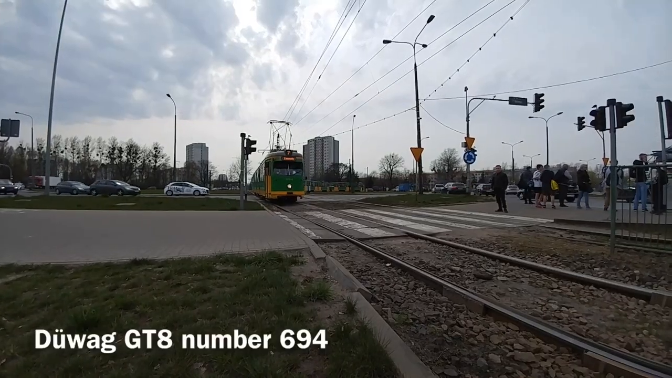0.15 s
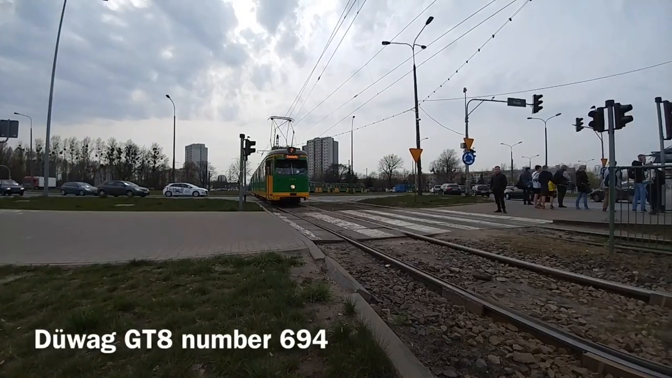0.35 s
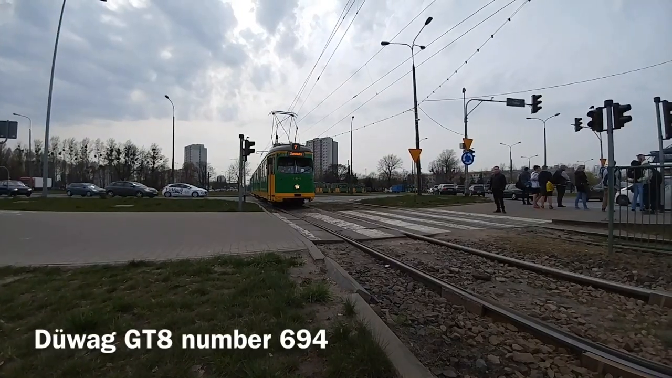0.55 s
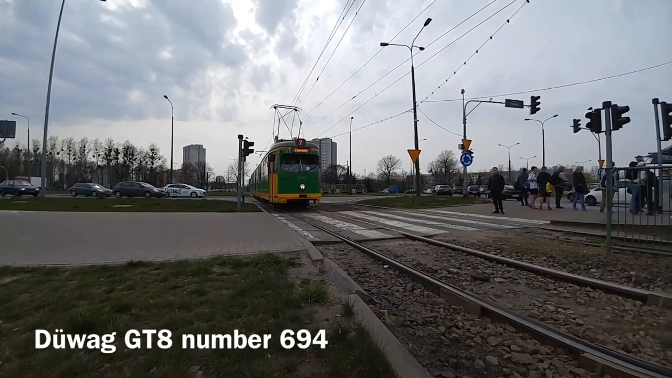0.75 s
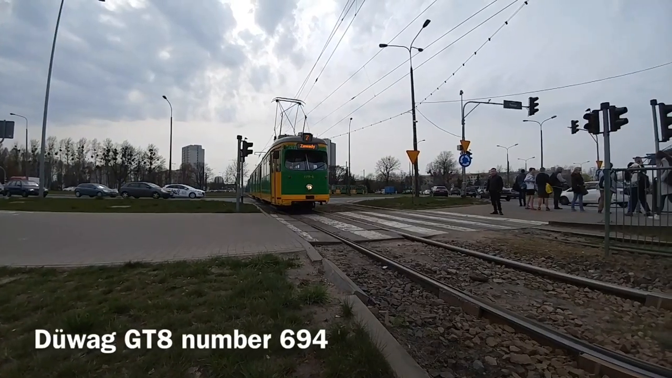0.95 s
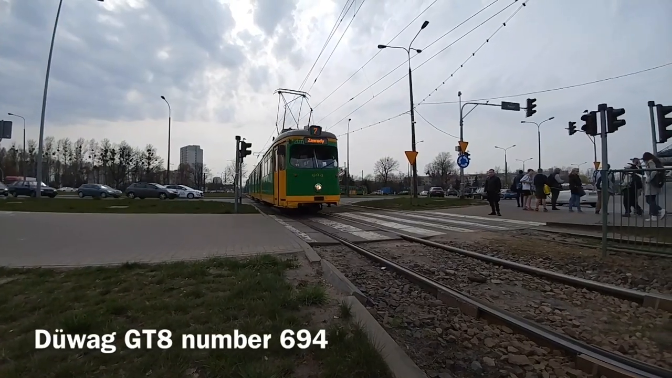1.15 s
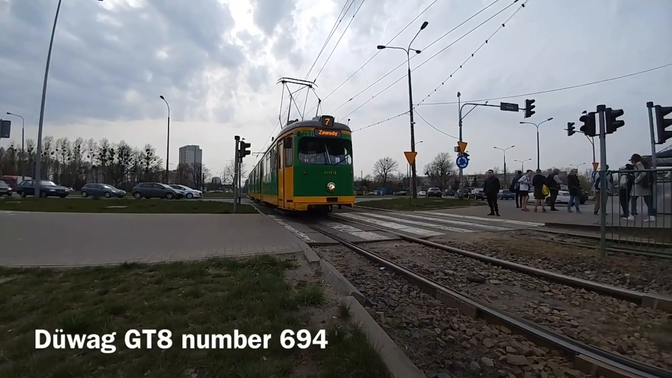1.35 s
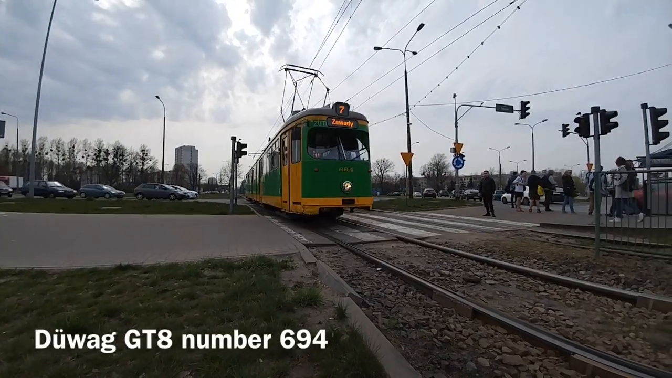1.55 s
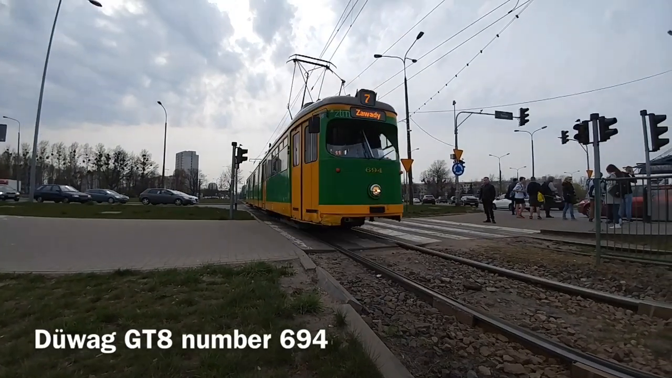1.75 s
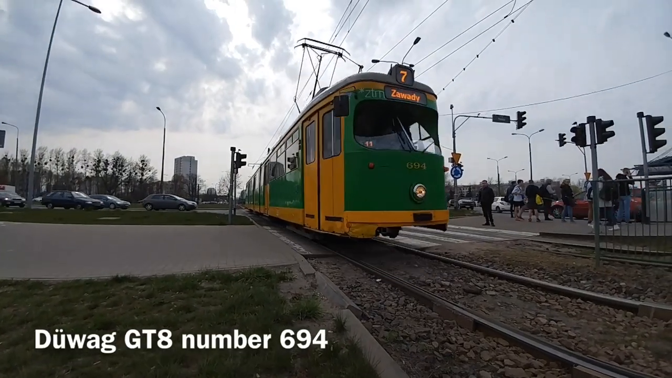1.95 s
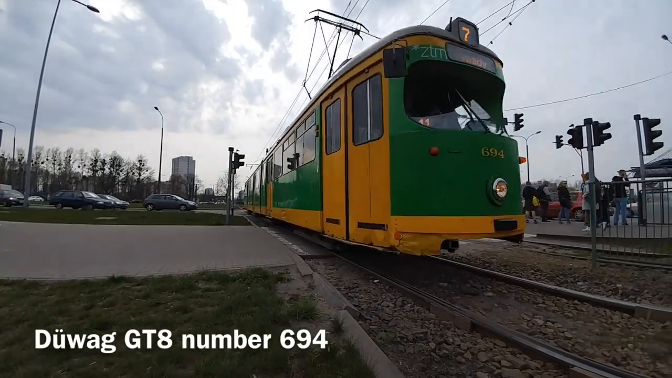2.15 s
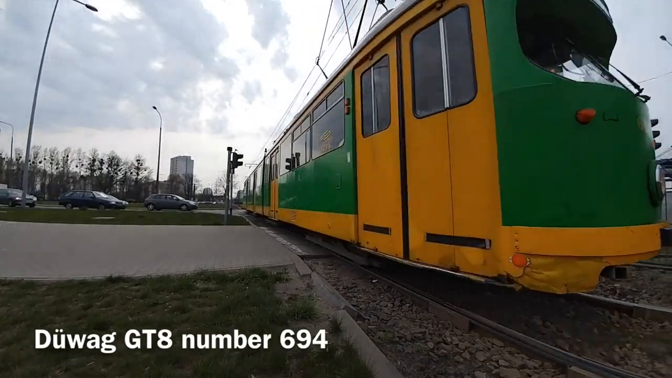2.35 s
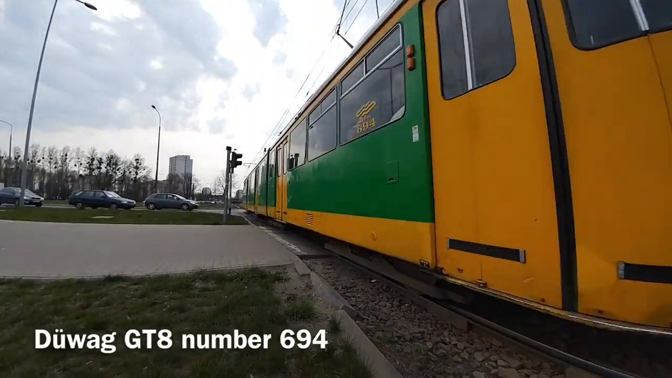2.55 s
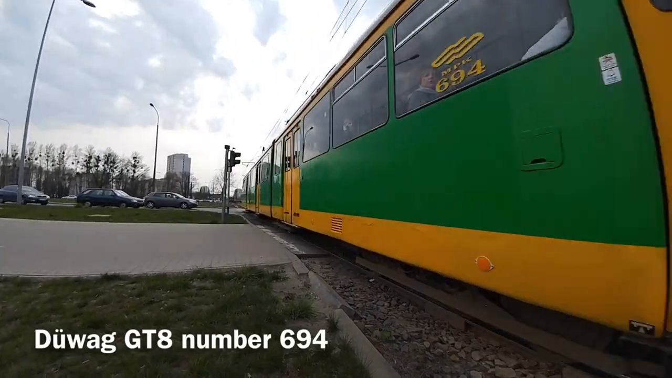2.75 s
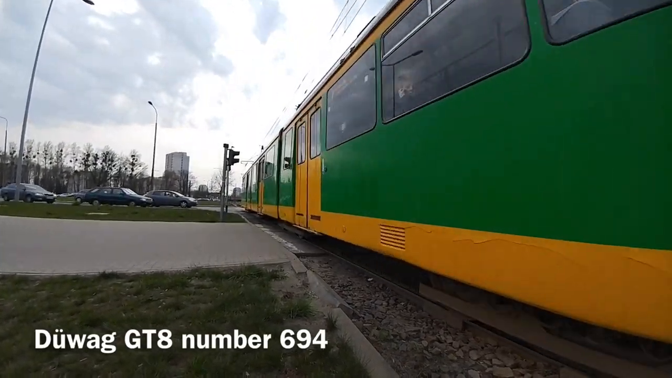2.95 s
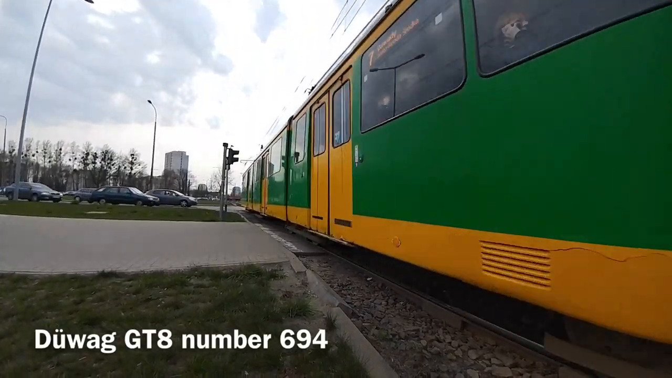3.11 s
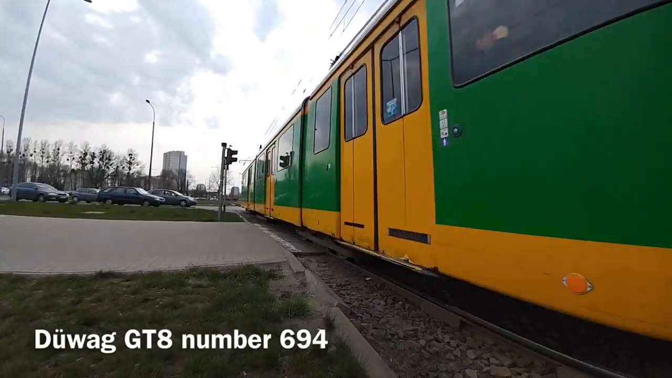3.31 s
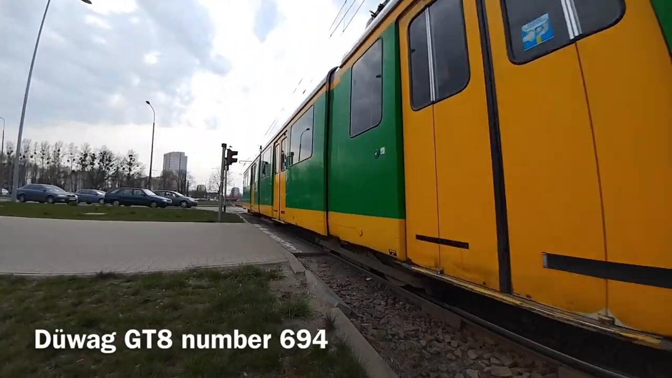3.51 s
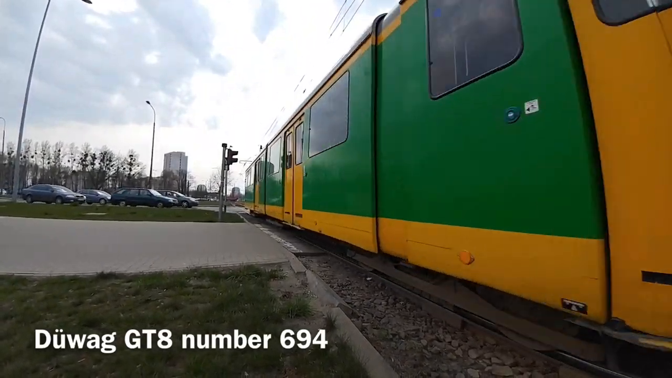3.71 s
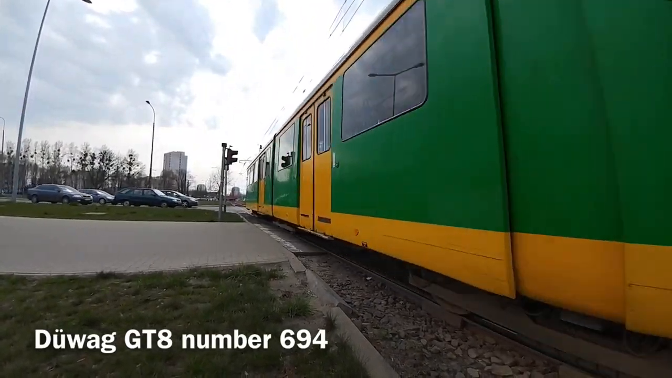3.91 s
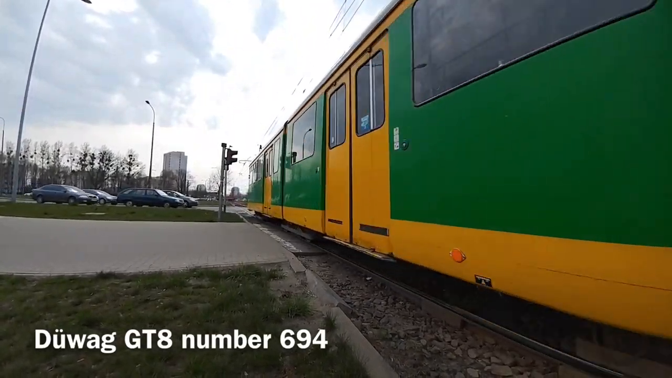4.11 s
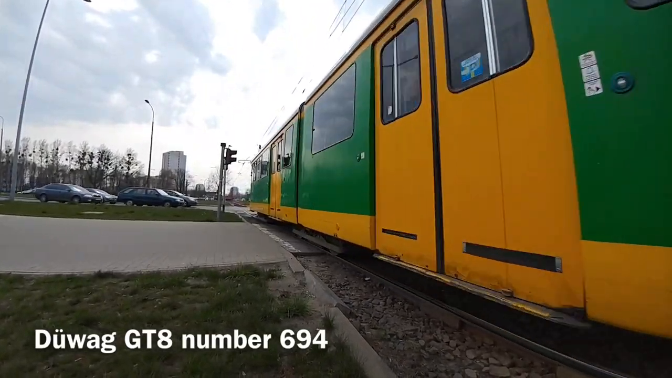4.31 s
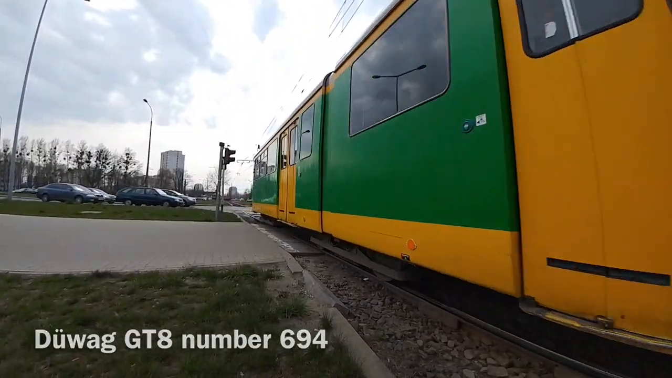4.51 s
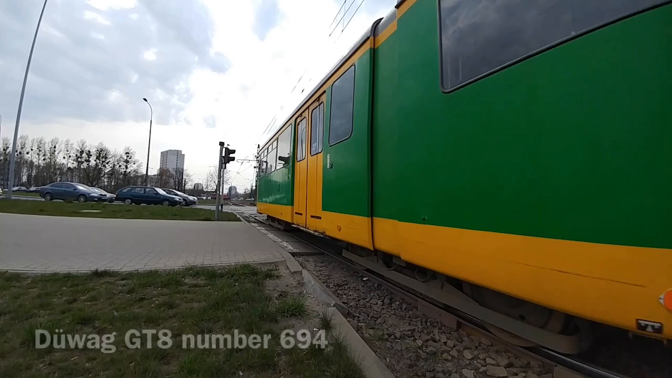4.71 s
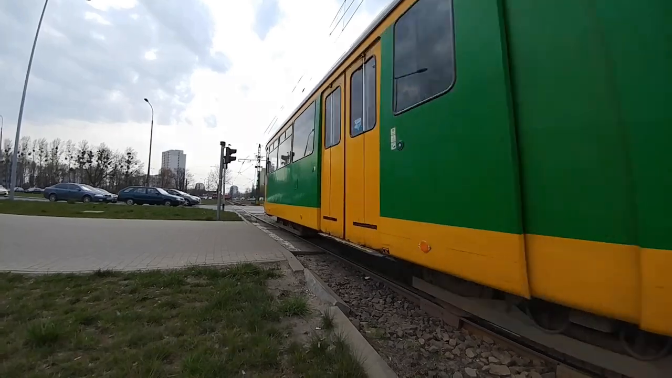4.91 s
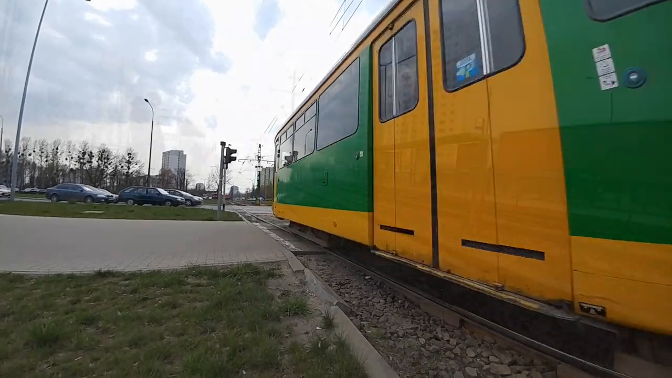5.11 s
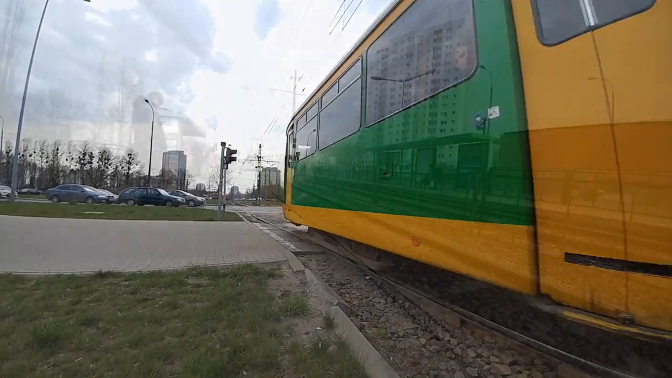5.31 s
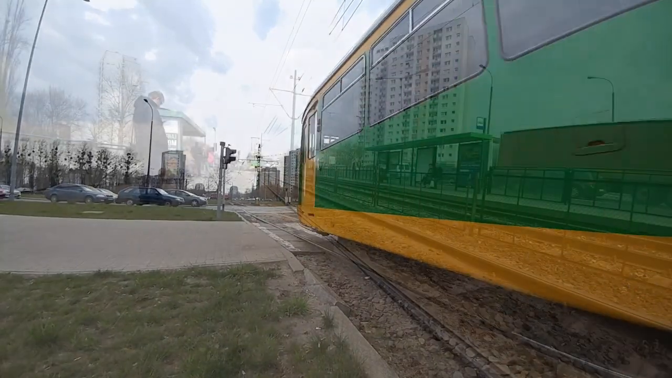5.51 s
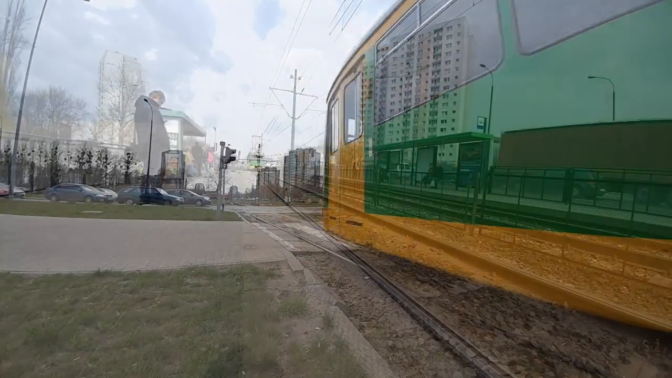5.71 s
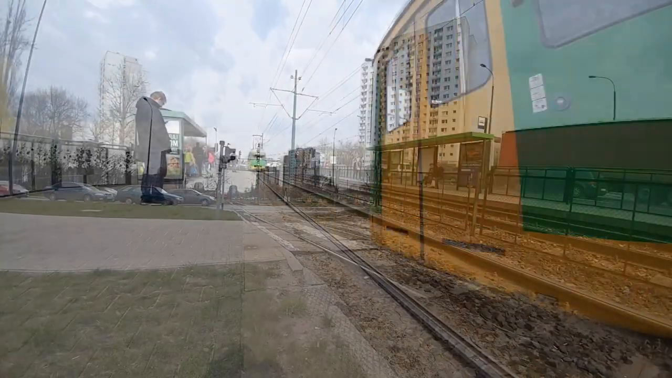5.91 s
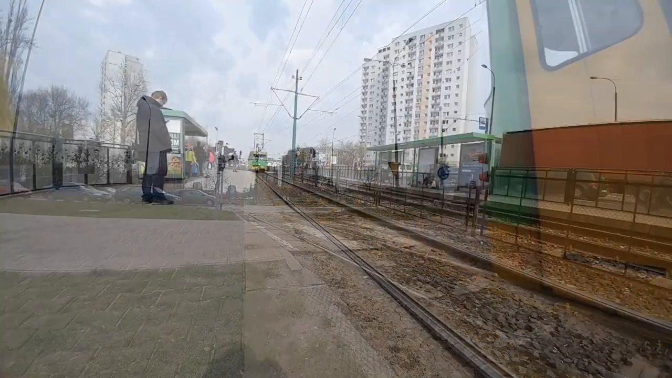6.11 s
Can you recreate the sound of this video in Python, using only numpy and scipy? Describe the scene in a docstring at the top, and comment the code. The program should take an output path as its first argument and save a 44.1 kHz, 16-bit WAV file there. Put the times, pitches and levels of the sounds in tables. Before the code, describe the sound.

A tram approaches from ahead across a street crossing, its wheels clacking over joints. As its nose draws level, the sound brightens sharply and widens: gritty rolling roar, heavy thumps, loose steel rattling in clusters. Several sets of wheels pass in turn, with brief squeaks near the end. Then the roar falls away, leaving rumble and traffic. Captured outdoors, close to the track, with dulled top treble.

```python
"""A low ground rumble and the hum of distant traffic, both coloured noise, with scuffs and knocks of steel.
An articulated tram rolls up over a street crossing and passes close to the right of a camera.
Its wheels knock (struck noise), then roar on rough rails (noise shaped by the bumps of the treads);
rails hum, body panels boom and the low rumble swells (sine modes that swell and fade).
Running gear rattles and ticks, grit crunches (bursts of coloured noise), flanges chirp (unsteady tones)."""
import sys
import numpy as np
from scipy import signal
from scipy.fft import rfft, irfft, next_fast_len
from scipy.io import wavfile
from scipy.ndimage import uniform_filter1d, minimum_filter1d, map_coordinates

SR = 44100
rng = np.random.default_rng(int(sys.argv[2]) if len(sys.argv) > 2 else 0)


def store_wav(level_fs):
    """Save 16-bit WAV to argv[1]."""
    pcm = np.round(np.clip(np.atleast_2d(level_fs), -1, 1) * 32767)
    wavfile.write(sys.argv[1], SR, pcm.T.astype(np.int16))


N = 276066

# spectrum of steel parts and grit: freq_hz, level_db
STEEL_SPECTRUM = [(500, -18), (1400, -6.5), (2400, 4.5), (3300, 0.5), (4500, 1.5), (6000, -3), (7400, -2),
                  (9000, 5.5), (16000, -3)]
# spectrum of small steel parts: freq_hz, level_db
TINKLE_SPECTRUM = [(1000, -30), (2400, -11), (3500, 1.5), (4500, 2), (6000, 2), (7400, 1), (9000, 6),
                   (16000, -4)]
# left-right likeness of sound from ahead and all around: freq_hz, correlation (-1 to 1)
ALIKE_FAR_CORR = [(40, 0.68), (100, 0.66), (200, 0.21), (600, 0.53), (1000, 0.27), (1400, -0.63),
                  (1850, 0.095), (2400, 0.59), (3200, -0.55), (4500, -0.02)]
SPEED_M_PER_S, TRACK_M = 6.36, 2.88  # steady tram speed; microphone to the wheels' path
HISS_GROWS_DB_PER_DB = 1.4  # treble gain per dB of nearness


def amp(db):
    """Decibels to gain."""
    return 10 ** (np.asarray(db) / 20)


def unit(x):
    """x at rms 1."""
    return x / np.sqrt(np.mean(x ** 2) + 1e-20)


def along(points, hz):
    """(Hz, value) points read on a log frequency axis."""
    f, v = np.transpose(points)
    return np.interp(np.log(hz + 1), np.log(f + 1), v)


def wobble(knots_per_s):
    """A smooth random curve."""
    knots = rng.standard_normal(int(N * knots_per_s / SR) + 4)
    return map_coordinates(knots, [np.arange(N) * knots_per_s / SR])


def filtered(x, response):
    """x times a response of frequency."""
    m = next_fast_len(N + 8192, True)
    spectrum = rfft(x, m) * response(np.fft.rfftfreq(m, 1 / SR))
    return irfft(spectrum, m)[..., :N]


def noise(spectrum):
    """Two unrelated coloured noises of joint rms 1."""
    return unit(filtered(rng.standard_normal((2, N)), lambda hz: amp(along(spectrum, hz))))


def steady(x, size):
    """x with its level evened out over size samples."""
    return x / np.sqrt(np.abs(uniform_filter1d(x ** 2, size=size)) + 1e-9)


def patchy(x, depth_db, size):
    """x coloured by resonances that come and go; size = their extent in (frequency bins, frames)."""
    z = signal.stft(x, nperseg=1024)[2]
    field = rng.standard_normal(z.shape[1:])
    for axis in (0, 1, 0, 1):
        field = uniform_filter1d(field, size=size[axis], axis=axis)
    coloured = signal.istft(z * amp(depth_db * unit(field)), nperseg=1024)[1]
    return unit(coloured[:, :N])


def step(s, width_s):
    """A smooth rise from 0 to 1 around time s."""
    return .5 + .5 * np.tanh((np.arange(N) / SR - s) / (2 * width_s))


def swell(s, half_s):
    """Bell-shaped envelope around time s."""
    return np.exp(-.5 * np.minimum(((np.arange(N) / SR - s) / half_s) ** 2, 50))


def bumps(rate_per_s, spread_db, t60_s):
    """Envelope of rms 1 of random contacts, each starting sharply and dying away."""
    hits = rng.random(N) < rate_per_s / SR
    power = hits * amp(spread_db * np.clip(rng.standard_normal(N), -2, 2)) ** 2
    decay = amp(-60 / (t60_s * SR)) ** 2
    return unit(np.sqrt(signal.lfilter([1], [1, -decay], power)))


def blows(rows, rise_s):
    """Summed envelope of (s, dB, t60 s) blows, each rising sharply and dying away within half a second."""
    out, t = np.zeros(N + SR), np.arange(SR // 2) / SR
    for s, db, t60_s in rows:
        out[round(s * SR):][:len(t)] += (1 - np.exp(-t / rise_s)) * amp(db - 60 * t / t60_s)
    return out[:N]


def ringing(rows, wander_rad):
    """Per (s, Hz, dB, half length s) a mode swells and fades, its phase wandering apart in two channels."""
    t, out = np.arange(N) / SR, np.zeros((2, N))
    drift = wander_rad * np.array([wobble(50), wobble(50)])
    starts = rng.uniform(0, 2 * np.pi, (len(rows), 2, 1))
    for (s, hz, db, half_s), phase in zip(rows, starts):
        on = np.abs(t - s) < 4 * half_s
        mode = np.sin(2 * np.pi * hz * t[on] + phase + drift[:, on])
        out[:, on] += amp(db) * swell(s, half_s)[on] * mode
    return out


def placed(pair, alike, lag_ms):
    """Two unrelated signals as left and right, partly alike, the left one late."""
    def mix(hz):
        turn = np.arccos(np.clip(along(alike, hz), -1, 1)) / 2
        return np.array([np.cos(turn), np.sin(turn)])

    def delay(hz):  # half the lag on each side
        return np.exp(1j * np.pi * hz * lag_ms / 1000 * np.array([[-1], [1]]))

    mid, side = filtered(pair, mix)
    return filtered(np.array([mid + side, mid - side]), delay)


def nearness_db():
    """Power from the four bogies adds up, each falling off with the square of its distance."""
    # bogies passing: abreast_s, strength_db
    bogies = [(2.68, -2), (3.64, -0.5), (4.78, 1.5), (5.4, -4)]
    t = np.arange(N) / SR
    power = sum(amp(db) ** 2 / (1 + (SPEED_M_PER_S * (t - s) / TRACK_M) ** 2) for s, db in bogies)
    return 10 * np.log10(power)


def car_nearness_db():
    """The long car body sounds from whichever part of it is nearest."""
    front_s, rear_s = 3.31, 5.2  # the droning floor is abreast between these
    t = np.arange(N) / SR
    away_m = SPEED_M_PER_S * (t - np.clip(t, front_s, rear_s))
    return -10 * np.log10(1 + (away_m / TRACK_M) ** 2)


def beside_share():
    """Share of the sound from beside the microphone (0-1); it rises as the nose draws level."""
    return step(2.15, width_s=.14)


def lulls_db():
    """Depth of the brief dips of the treble."""
    # treble dips: middle_s, half_length_s, depth_db
    lulls = [(.51, .04, 6), (1.43, 0.077, 23), (2.254, 0.0083, 13), (2.59, 0.012, 3.5), (2.788, 0.015, 2),
             (3.091, .018, 4.5), (3.28, 0.13, 1), (3.377, 0.0059, 4), (4.321, 0.0075, 3), (4.433, 0.015, 5),
             (4.626, 0.0046, 7), (5.3, 0.026, 0.5), (6.09, 0.029, 1.5)]
    return sum(db * swell(s, half_s) for s, half_s, db in lulls)


def street():
    """Distant road traffic: coloured noise from all around, its level wavering slightly."""
    # traffic spectrum: freq_hz, level_db
    street_spectrum = [(60, -9), (200, 8), (500, 16), (1000, 6), (2000, -5), (3200, -55), (6000, -60),
                       (8000, -31), (9100, -6), (10500, -8.5), (15500, -6)]
    level_db = -32.5 + 0.15 * wobble(6.0)
    return amp(level_db) * placed(noise(street_spectrum), ALIKE_FAR_CORR, lag_ms=0)


def flanges():
    """A flange sticks and slips on the rail head: one wheel mode sings briefly, clear or hoarse."""
    # chirps: middle_s, pitch_hz, level_db, half_length_s, octave_db (re fundamental),
    # hoarseness (0-1), pitch_fall (share)
    chirps = [(1.618, 5270, -46, .02, -40, 0.9, .005), (1.738, 5760, -46, .018, -40, .9, 0.01),
              (4.762, 2000, -24, .055, -27, 0.4, 0.0019), (4.835, 2033, -15, .014, -21, 0.25, -.002),
              (4.972, 2970, -30, .02, -2, 0.23, .002), (5.002, 2894, -16.5, 0.012, -1.5, 0.3, 0.0078),
              (5.267, 2980, -22.5, .016, -26, 0.3, 0.023), (5.345, 3360, -26, .009, -20, 0.3, 0.0036),
              (5.481, 1896, -28, 0.028, -25, 0.28, 0.012), (5.671, 5360, -23.5, .007, -42, 0.4, 0),
              (5.964, 5970, -26, 0.0061, -39, .9, 0)]
    waver_share, waver_hoarse_share = 0.0038, 0.032  # pitch unsteadiness: of all, added by hoarseness
    t, out = np.arange(N) / SR, np.zeros((2, N))
    waver = wobble(700)
    rasp = np.array([wobble(380) + 1j * wobble(380) for _ in range(2)])
    for s, hz, db, half_s, octave_db, hoarse, fall in chirps:
        on = np.abs(t - s) < 5 * half_s
        hoarse = np.clip(hoarse, 0, 1)
        bend = 1 - fall * np.tanh((t[on] - s) / half_s)
        pitch_hz = hz * bend * (1 + (waver_share + waver_hoarse_share * hoarse) * waver[on])
        turn = np.exp(2j * np.pi * np.cumsum(pitch_hz) / SR)
        grip = np.sqrt(1 - hoarse) + np.sqrt(hoarse / 2) * rasp[:, on]
        tone = np.real(grip * (turn + amp(octave_db) * turn ** 2))
        out[:, on] += amp(db) * swell(s, half_s)[on] * tone
    return out


def ticks():
    """Single hard contacts of steel: one crisp crack each."""
    # ticks of steel on steel: start_s, level_db
    tick_rows = [(2.505, -12.5), (2.837, -11), (2.872, -7), (3.213, -16), (3.364, -15), (3.392, -16),
                 (3.632, -14), (3.836, -14), (4.124, -15), (4.156, -13), (4.329, -12), (4.358, -9),
                 (4.603, -16), (4.637, -18), (4.648, -15), (5.103, -9), (5.114, -7), (5.425, -21),
                 (5.673, -20)]
    cracks = blows([(s, db, .016) for s, db in tick_rows], rise_s=.0004)
    return cracks * patchy(noise(TINKLE_SPECTRUM), depth_db=3, size=(8, 4))


def rattles():
    """Steel parts clash and scuff in short clusters of contacts: small ones tinkle, heavy ones clank."""
    # loudest clashes of loose running gear: start_s, tinkle_db, clank_db, t60_s
    clashes = [(1.096, -31.5, -47, 0.22), (1.23, -38, -40, 0.14), (1.29, -38, -40, 0.15),
               (2.191, -21.5, -21.5, 0.13), (2.285, -25.5, -22.5, 0.11), (2.341, -24, -20.5, 0.089),
               (2.395, -27, -22, 0.21), (2.427, -21, -18, .07), (2.504, -16, -21, 0.08),
               (2.536, -21, -24, 0.091), (2.632, -24, -20.5, 0.13), (2.692, -41, -17, 0.068),
               (2.724, -22, -14.5, 0.094), (2.761, -32, -17, 0.059), (2.834, -16, -22, 0.23),
               (3.133, -21.5, -18, 0.079), (3.193, -22, -12.5, 0.042), (3.39, -16.5, -14, 0.094),
               (3.413, -22, -20.5, 0.19), (3.436, -32, -19, 0.08), (3.517, -23, -17.5, 0.14),
               (3.553, -20, -27, 0.056), (3.575, -32, -29, 0.024), (3.633, -18, -14, 0.1),
               (3.658, -19, -19, 0.039), (3.724, -20, -31, 0.06), (3.805, -17, -24, 0.067),
               (3.831, -13, -15, 0.18), (3.869, -20, -29, 0.15), (4.024, -25, -22, .07),
               (4.09, -18, -16, 0.059), (4.121, -16.5, -23, 0.14), (4.152, -16, -17, 0.045),
               (4.181, -18.5, -22, 0.11), (4.209, -26, -23, 0.2), (4.355, -14, -15, 0.1),
               (4.485, -23, -30, 0.036), (4.522, -35, -24, 0.065), (4.594, -23, -18, 0.093),
               (4.637, -15, -18.5, 0.13), (4.665, -16, -22, 0.055), (4.823, -12.5, -21, 0.14),
               (4.847, -20, -23, 0.15), (4.892, -22, -18, 0.091), (5.152, -18, -28, 0.13),
               (5.202, -18, -15, 0.082), (5.328, -26.5, -22, 0.75), (5.423, -25, -25, 0.035),
               (5.549, -29, -17, 0.064), (5.589, -19.5, -22.5, 0.18), (5.615, -40, -23.5, 0.26),
               (5.717, -36, -23, 0.049), (5.99, -26.5, -23, 0.089), (6.149, -21.5, -21, 0.086)]
    # steel scuffing on steel: middle_s, hiss_db, half_length_s, groan_db
    scuff_rows = [(0.128, -33.5, 0.034, -22.5), (0.225, -41, 0.13, -29), (1.178, -41.5, 0.14, -35),
                  (1.953, -58, 0.087, -29), (2.193, -32.5, 0.033, -22), (2.703, -49, 0.032, -17.5),
                  (2.835, -25.5, 0.029, -15.5), (2.93, -28, 0.032, -18), (3.444, -26, 0.03, -18.5),
                  (4.007, -29.5, 0.061, -21), (4.32, -40, 0.026, -20.5), (4.61, -22, .053, -23),
                  (4.943, -22.5, 0.031, -34), (5.696, -27, 0.014, -18), (5.864, -33, 0.047, -25.5),
                  (5.965, -28.5, 0.025, -37), (6.05, -31, 0.013, -52), (6.17, -29, 0.019, -57)]
    # spectrum of heavy parts: freq_hz, level_db
    clank_spectrum = [(500, -9), (1000, 1.5), (1500, 0), (2300, -2.5), (3000, -9.5), (4500, -10),
                      (9000, -33)]
    # spectrum of groaning scuffs: freq_hz, level_db
    groan_spectrum = [(300, -5.5), (600, 1.5), (850, -2.5), (1130, -4), (1400, -8.5), (1800, -15.5),
                      (4000, -37)]
    clatter_db = -33.5  # lesser clashes at random, heard close by

    tinkles = blows([(s, db, t60_s) for s, db, _, t60_s in clashes], rise_s=.0018)
    clanks = blows([(s, db, t60_s) for s, _, db, t60_s in clashes], rise_s=.0018)
    jolts = bumps(rate_per_s=41, spread_db=3, t60_s=.16)
    jolt_db = clatter_db + HISS_GROWS_DB_PER_DB * nearness_db() - lulls_db()
    clatter = amp(jolt_db) * beside_share() * jolts
    scuffs = sum(amp(db) * swell(s, half_s) for s, db, half_s, _ in scuff_rows)
    groans = sum(amp(db) * swell(s, half_s) for s, _, half_s, db in scuff_rows)

    contacts = bumps(rate_per_s=1500, spread_db=2.2, t60_s=.018)
    small = steady(patchy(noise(TINKLE_SPECTRUM), depth_db=2.8, size=(6, 4)), size=1500)
    heavy = steady(patchy(noise(clank_spectrum), depth_db=2.7, size=(3, 3)), size=1500)
    steel = patchy(noise(STEEL_SPECTRUM), depth_db=3.2, size=(4, 4))
    groan = steady(patchy(noise(groan_spectrum), depth_db=2.6, size=(2, 5)), size=1500)
    hisses = np.hypot(clatter, scuffs) * steel
    return contacts * (tinkles * small + clanks * heavy + hisses + groans * groan)


def resonances():
    """Single modes swell and fade: the low rumble swells, panels boom, the rail hums."""
    # brief swells of the low rumble near 61 Hz: middle_s, level_db
    rumble_swells = [(.7, -13.5), (.86, -18), (1.1, -17), (1.41, -13.5), (1.72, -13.5), (2.17, -11),
                     (2.36, -13), (2.68, -17), (2.78, -15), (3.81, -15.5), (3.96, -12), (4.55, -14),
                     (5.75, -15.5)]
    # car body panels booming: middle_s, pitch_hz, level_db, half_length_s
    boom_rows = [(2.17, 158, -20, 0.039), (2.44, 201.4, -18.5, 0.041), (2.56, 187.8, -16, 0.02),
                 (2.84, 290, -14, 0.017), (2.92, 235, -17, 0.027), (3.03, 263, -13, 0.02),
                 (3.105, 255, -10.5, 0.013), (3.14, 142, -12.5, 0.02), (3.2, 325, -12.5, 0.018),
                 (3.24, 215, -17, 0.04), (3.43, 274, -15.5, 0.049), (3.79, 209, -15, 0.068),
                 (3.98, 192.4, -9, 0.018), (4.09, 250.3, -13.5, 0.019), (4.18, 322.7, -11, .028),
                 (4.3, 126.4, -18, 0.039), (4.4, 191.2, -15, 0.038), (4.63, 258, -15.5, 0.079),
                 (4.9, 203.3, -16, 0.043), (5.01, 196.8, -13, 0.022), (5.27, 199, -13.5, 0.026),
                 (5.42, 225, -19, 0.058), (5.58, 276.7, -16.5, 0.044)]
    # rail humming under a wheel: middle_s, pitch_hz, level_db, half_length_s
    hum_rows = [(1.93, 560, -23, 0.023), (2.55, 487, -16, 0.034), (2.96, 551, -13.5, 0.015),
                (3.37, 608, -15.5, 0.063), (3.44, 791, -18, 0.069), (3.87, 850, -19, 0.068),
                (4.01, 905, -17.5, 0.021), (4.61, 769, -18, 0.041), (4.29, 543, -17, .04),
                (4.87, 546, -20, .035), (4.95, 830, -18, 0.085), (5.04, 538, -17, 0.048)]
    rumble_hz, rumble_half_s = 60.9, .032
    rumbles = ringing([(s, rumble_hz, db, rumble_half_s) for s, db in rumble_swells], wander_rad=.4)
    booms = ringing(boom_rows, wander_rad=.7)
    hums = ringing(hum_rows, wander_rad=2.2)
    return rumbles + booms + hums


def knocks():
    """Each wheel drops into a joint or crossing gap: the rail clacks and the car body thumps."""
    # wheels over gaps: start_s, thump_db, clack_db
    knock_rows = [(0.356, -22, -25), (0.438, -16.5, -35), (.59, -21, -28), (0.699, -19, -15),
                  (0.857, -14, -16), (0.893, -20.5, -14.5), (1.005, -16, -17.5), (1.055, -28, -31),
                  (1.345, -13, -11.5), (1.391, -18, -14), (1.595, -31, -26), (1.916, -28, -10.5),
                  (1.949, -16.5, -12), (2.095, -8, -11), (2.165, -7, -15), (2.242, -11, -9.5),
                  (2.509, -7, -16), (2.549, -16, -28), (2.639, -15, -10), (2.957, -9, -13),
                  (3.026, -20, -33), (3.092, -5, -30), (3.189, -2, -15), (3.362, -14, -6), (3.811, -10, -6),
                  (4.325, -13, -4), (4.82, -20, -5.5), (4.93, -8, -15), (5.029, -27, -7)]
    # spectrum of the struck body: freq_hz, level_db
    thump_spectrum = [(90, -19), (180, 7), (240, 2), (320, 1.5), (450, -15), (1000, -53.5)]
    # spectrum of the struck rail: freq_hz, level_db
    clack_spectrum = [(250, -5), (380, -3), (540, 6.5), (700, 0.5), (880, -11), (1150, -15), (2000, -34),
                      (6000, -82)]
    thump_t60_s, clack_t60_s = 0.12, 0.096
    thumps = blows([(s, db, thump_t60_s) for s, db, _ in knock_rows], rise_s=.002)
    clacks = blows([(s, db, clack_t60_s) for s, _, db in knock_rows], rise_s=.0012)
    body = thumps * steady(noise(thump_spectrum), size=1100)
    rail = clacks * steady(noise(clack_spectrum), size=600)
    return body + rail


def rolling():
    """Rough treads shake the ground, the car body, the rails and the wheels; grit crunches under them."""
    # ground spectrum: freq_hz, level_db
    ground_spectrum = [(15, -34), (30, -21), (40, -16), (52, -5), (62, 2), (80, -4), (110, -4), (150, -7.5),
                       (220, -16.5), (400, -62)]
    # car body spectrum: freq_hz, level_db
    body_spectrum = [(70, -50), (125, -7.5), (160, -9.5), (192, -0.5), (225, -2.5), (270, -0.5),
                     (330, -5.5), (400, -9), (600, -24), (1200, -42)]
    # rail roar spectrum: freq_hz, level_db
    roar_spectrum = [(200, -45), (370, -15.5), (460, -2), (545, -0.5), (640, -3), (760, -4.5), (900, -10),
                     (1020, -13), (1180, -13.5), (1450, -34), (2200, -49), (5000, -60)]
    # wheel ring spectrum: freq_hz, level_db
    ring_spectrum = [(700, -5), (1200, 0.5), (1500, 3), (1750, 2), (2050, 0), (2450, -5), (2900, -9),
                     (4000, -12.5), (9000, -28.5)]
    ground_peak_db, ground_peak_s, rise_db_per_s, fade_db_per_s = -18.5, 2.9, 1.08, 0.97
    surge_depth_db, surges_per_s = 0.5, 13  # rougher and smoother stretches of rail
    roar_lull_share = 0.25  # how far the roar dips along with the treble

    close_db, near = nearness_db(), beside_share()
    # the skirt shades the treble sharply, except while the wheels are in view
    shaded = 1 - step(2.32, width_s=.018) + step(5.9, width_s=.018)
    surge_db = surge_depth_db * wobble(surges_per_s)
    since_peak_s = np.arange(N) / SR - ground_peak_s
    ground_db = ground_peak_db + np.minimum(rise_db_per_s * since_peak_s, -fade_db_per_s * since_peak_s)
    # each radiator: base level, gain with nearness, loss while hidden or shaded
    body_db = -16 + 0.78 * car_nearness_db() - 4 * (1 - near)
    body_db = body_db + surge_depth_db * wobble(surges_per_s)
    roar_db = -16.5 + 0.96 * close_db - 2.5 * (1 - near)
    roar_db = roar_db + surge_db - roar_lull_share * near * lulls_db()
    ring_db = -25 + 0.92 * close_db - 2.5 * shaded + near * (surge_db - lulls_db())
    ring_db = ring_db - 2.5 * step(5.42, width_s=.06)  # less ring backwards, once the last bogie is past
    hiss_db = -28 + HISS_GROWS_DB_PER_DB * close_db - 10 * shaded + near * surge_db - lulls_db()

    # distance blurs the bumps of the treads
    tread = np.sqrt(1 - near + near * bumps(rate_per_s=520, spread_db=2.1, t60_s=.045) ** 2)
    # single grains stand out only close by
    grit = np.sqrt(1 - near + near * bumps(rate_per_s=380, spread_db=3.5, t60_s=.05) ** 2)
    # the contact point wanders over the tread, so that the modes of rail and wheel take turns
    rail_modes = steady(patchy(noise(roar_spectrum), depth_db=2, size=(2, 5)), size=4000)
    wheel_modes = patchy(noise(ring_spectrum), depth_db=2.5, size=(2, 5))
    panel_modes = steady(patchy(noise(body_spectrum), depth_db=1.5, size=(1, 8)), size=4000)

    ground = amp(ground_db) * steady(noise(ground_spectrum), size=5000)
    # the same bumps drive body, rail and wheel
    body = amp(body_db) * unit(tread ** .5) * panel_modes
    roar = amp(roar_db) * tread * rail_modes
    ring = amp(ring_db) * unit(tread ** .5) * wheel_modes
    crunch = amp(hiss_db) * grit * patchy(noise(STEEL_SPECTRUM), depth_db=2.6, size=(4, 4))
    return ground + body + roar + ring + crunch


def tram():
    """All that the tram radiates, bar the flange chirps, as two unrelated signals."""
    return rolling() + knocks() + resonances() + rattles() + ticks()


def scene():
    """The sound moves from the bogies in the open street ahead to those beside the right port."""
    # left-right likeness of sound from beside: freq_hz, correlation (-1 to 1)
    alike_near_corr = [(40, 0.73), (120, 0.96), (280, 1), (450, 1), (800, 0.91), (1100, 0.14), (1500, 0.58),
                       (2400, 0.027), (4000, 0.025), (9000, 0.052)]
    near = beside_share()
    ahead = amp(-0.57) * np.sqrt(1 - near) * placed(tram(), ALIKE_FAR_CORR, lag_ms=0)
    beside = amp(-0.27) * np.sqrt(near) * placed(tram(), alike_near_corr, lag_ms=.31)
    return ahead + beside + flanges() + street()


def record(dry):
    """The camera's housing colours its two ports and notches the treble; a fast limiter tames peaks."""
    # colour of both ports: freq_hz, level_db
    ports = [(20, -9), (44, 2), (7600, 2), (8200, -8.5), (8650, -19.5), (9080, -34), (9600, -18.5),
             (10300, -16.5), (11200, -21), (12000, -23), (13000, -24), (15500, -26)]
    # shading by the housing: freq_hz, left_minus_right_db
    shade = [(100, -1), (700, -1), (1400, 0.5), (2600, -3.5), (4000, -1), (5200, -6), (7300, -13),
             (8400, -6.5), (9800, 5), (12000, 0)]
    top_hz = 15725

    def housing(hz):
        return amp(along(ports, hz) + along(shade, hz) * np.array([[.5], [-.5]]))

    x = filtered(dry, housing)
    needed = np.minimum(1, .97 / (np.abs(x) + 1e-9))
    gain = uniform_filter1d(minimum_filter1d(needed, size=45), size=45)
    return filtered(x * gain, lambda hz: hz < top_hz)


dry = scene()
out = record(dry)
store_wav(out)
```